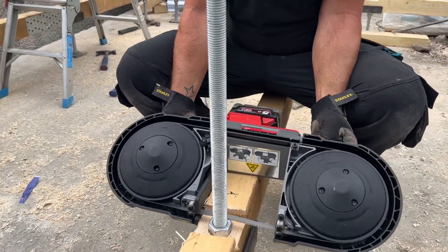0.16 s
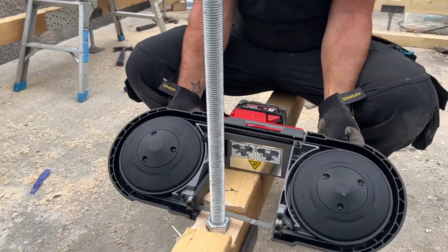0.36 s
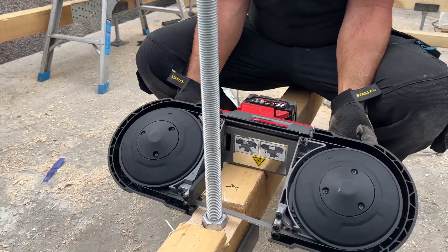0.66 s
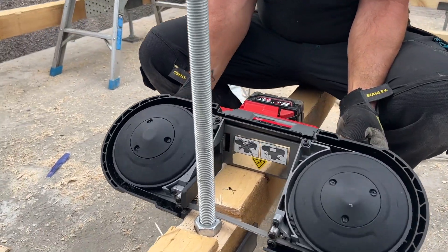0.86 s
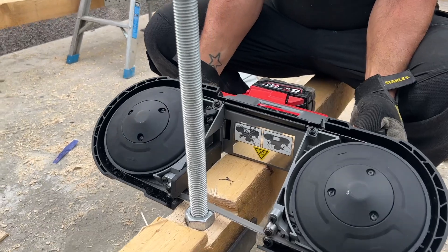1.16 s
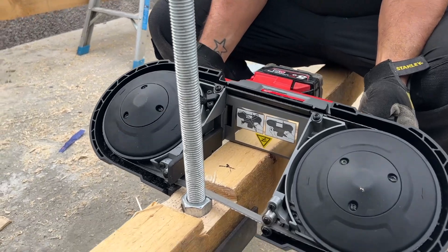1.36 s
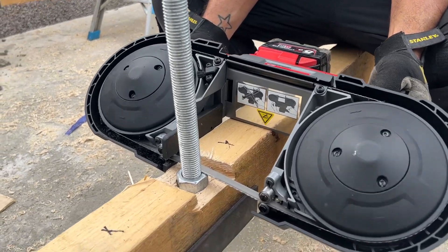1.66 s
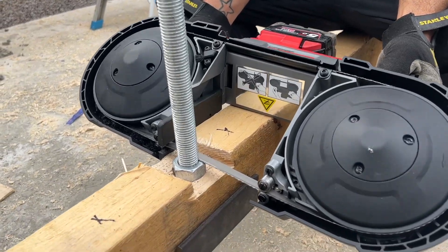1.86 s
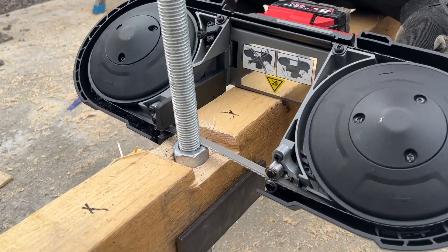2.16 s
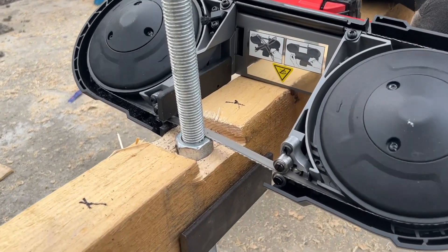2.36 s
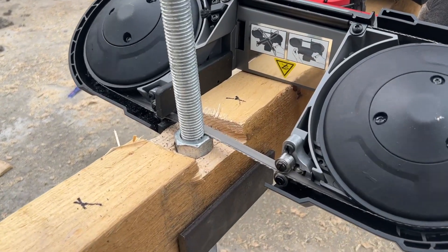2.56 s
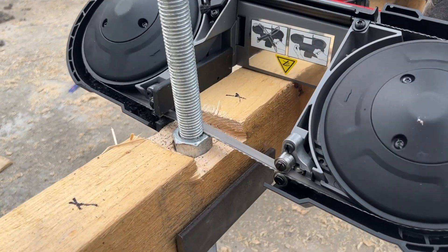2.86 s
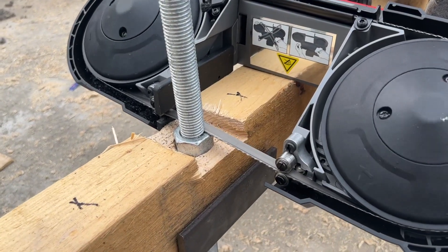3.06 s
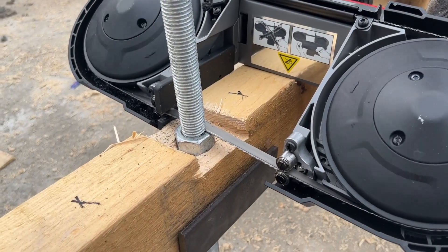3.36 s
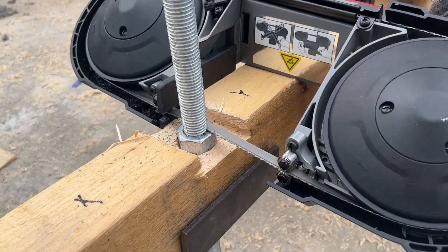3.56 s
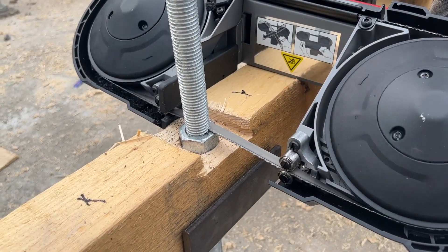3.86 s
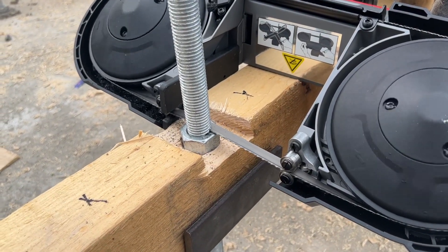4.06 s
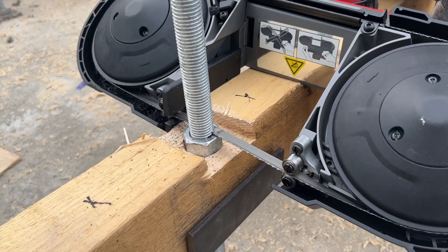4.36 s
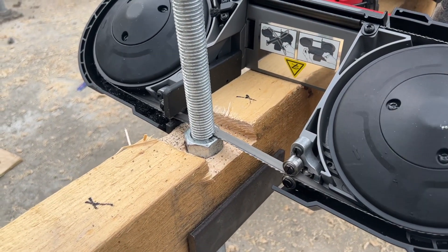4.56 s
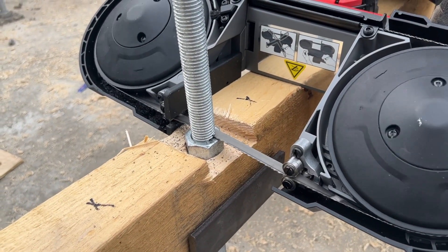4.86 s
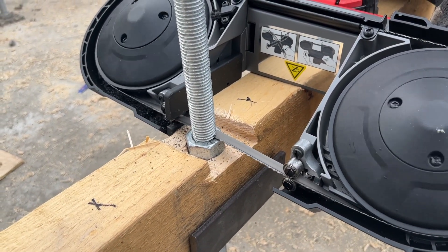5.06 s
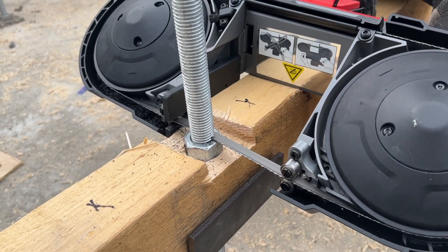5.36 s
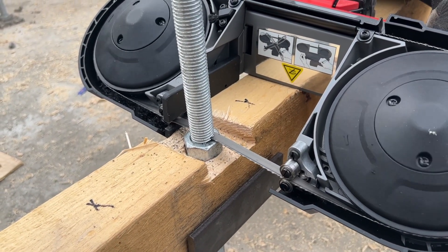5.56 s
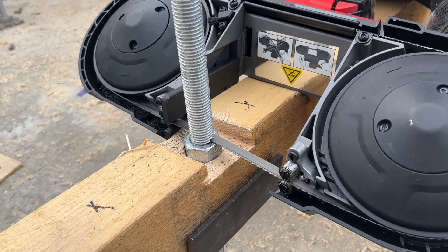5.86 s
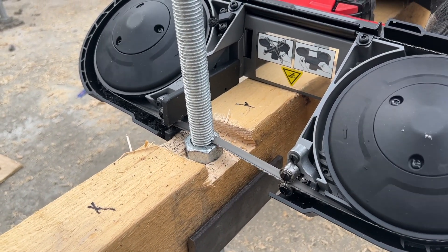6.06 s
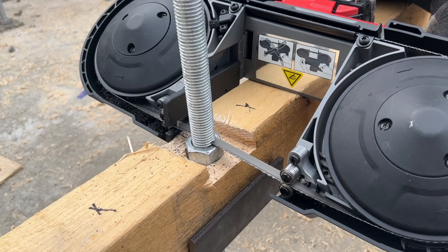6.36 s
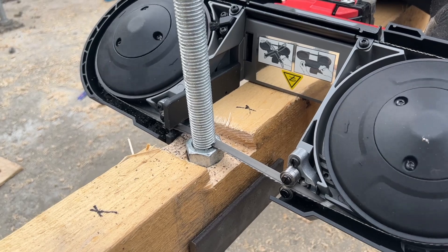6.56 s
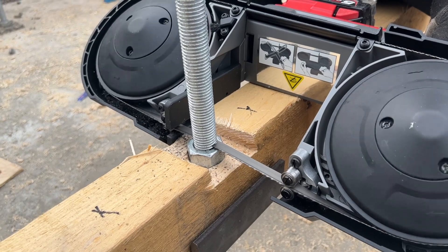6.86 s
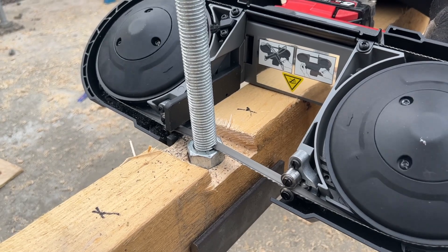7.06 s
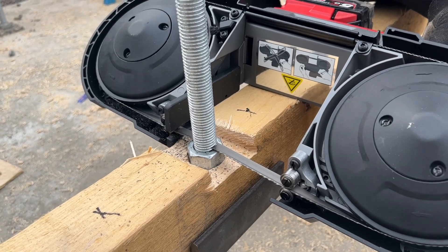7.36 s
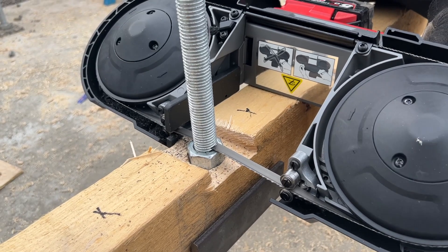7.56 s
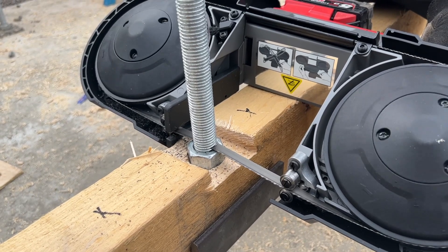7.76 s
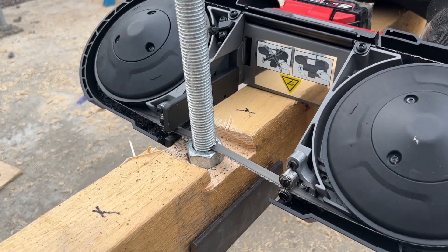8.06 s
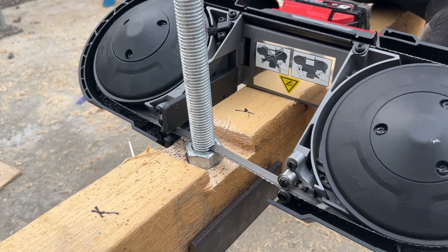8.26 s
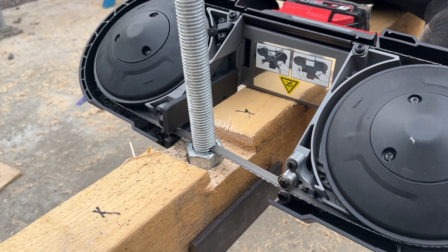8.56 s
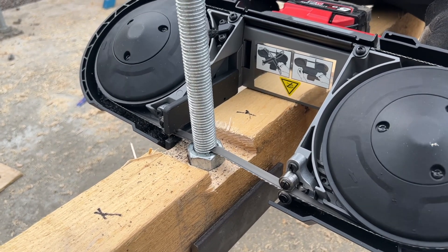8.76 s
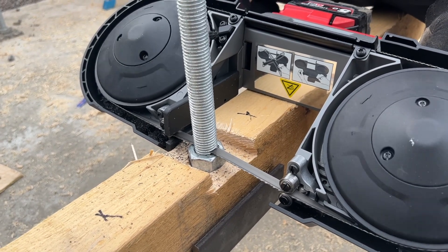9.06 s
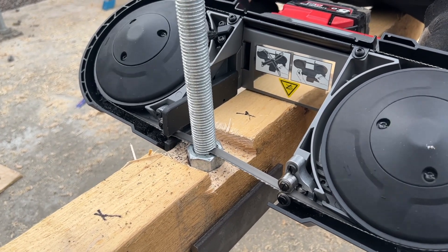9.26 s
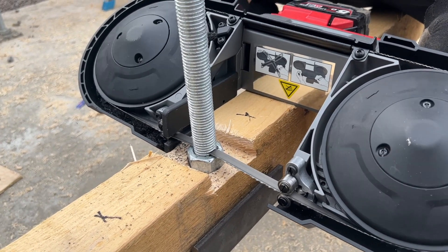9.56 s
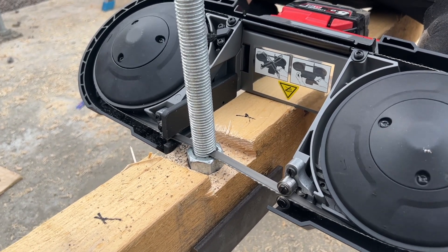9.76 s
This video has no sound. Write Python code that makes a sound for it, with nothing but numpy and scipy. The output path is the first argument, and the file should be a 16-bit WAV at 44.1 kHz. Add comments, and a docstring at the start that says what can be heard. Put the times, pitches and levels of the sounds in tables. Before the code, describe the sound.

A cordless band saw whines and squeals steadily while its teeth rasp and sizzle through a threaded steel rod, with occasional clacks and dull bumps outdoors.

```python
"""A band saw whines and squeals from the start as it cuts a threaded steel rod outdoors, close to a microphone.
Steady whines sound on multiples of the shaft speed over noise of air and rattle shaped by the housing. The
looping blade drags unevenly and makes the speed flutter; its rubbing squeals on two wavering modes. The teeth
rasp and sizzle: noise and tiny impacts through resonances that shift as the slot deepens. Clacks, dull damped
bumps, low rumble and wind join in; loud peaks duck the gain."""
import sys
import numpy as np
from scipy import signal
from scipy.fft import rfft, irfft, next_fast_len
from scipy.io import wavfile
from scipy.ndimage import uniform_filter1d

SR = 44100
rng = np.random.default_rng(int(sys.argv[2]) if len(sys.argv) > 2 else 0)


def wav_out(sig):
    """Save sig, one row per channel (or a flat mono array), as 16-bit PCM at SR to the path in sys.argv[1]."""
    wavfile.write(sys.argv[1], SR, np.round(np.clip(np.atleast_2d(sig).T, -1, 1) * 32767).astype(np.int16))


N = 437031
T = np.arange(N) / SR
DEPTH = T / T[-1]  # how far the cut has gone, 0-1

# shaft turns per loop of the blade, turn of its drive wheel, turn of the reduction gear
TURNS_PER_LOOP, TURNS_PER_WHEEL, TURNS_PER_GEAR = 153.58, 67.35, 6.68

# resonances of the wheel covers: centre_hz, width_hz, lift_db
COVER_MODES = [(616, 24, -9), (650, 79, 5.5), (1018, 50, 4)]


def amp(db):
    """Decibels to gain."""
    return np.exp(np.asarray(db) * np.log(10) / 20)


def unit(x):
    """Scales to rms 1."""
    return x / np.sqrt(np.mean(x ** 2) + 1e-20)


def noise():
    """White noise over the whole scene."""
    return rng.standard_normal(N)


def curves(table):
    """Every column of a timed table, interpolated sample by sample."""
    s, *columns = np.transpose(table)
    return [np.interp(T, s, column) for column in columns]


def colour(x, spectrum, resonances=()):
    """Filters x by a broad spectrum with narrow resonances on top; rms 1."""
    size = next_fast_len(N)
    hz = np.fft.rfftfreq(size, 1 / SR)
    spectrum_hz, spectrum_db = np.transpose(spectrum)
    shape_db = np.interp(np.log(hz + 1), np.log(spectrum_hz), spectrum_db)
    for centre_hz, width_hz, lift_db in resonances:
        shape_db = shape_db + lift_db / (1 + (2 * (hz - centre_hz) / width_hz) ** 2)
    return unit(irfft(rfft(x, size) * amp(shape_db), size)[:N])


def high_pass(x, hz):
    """Takes the bass away below hz."""
    return signal.sosfilt(signal.butter(2, hz, "high", fs=SR, output="sos"), x)


def wander(hz):
    """Random motion of rms 1, mostly slower than hz."""
    step = 20  # samples
    coarse_t = T[::step]
    pole = np.exp(-2 * np.pi * hz * step / SR)
    steps = signal.lfilter([1], [1, -pole], rng.standard_normal(len(coarse_t)))
    return unit(np.interp(T, coarse_t, uniform_filter1d(steps, size=5)))


def lifts(events, step=50):
    """Brief swells of level in dB, from rows of time, half length and height."""
    t = T[::step]
    lift_db = sum(db * np.exp(-((t - s) / half_s) ** 2) for s, half_s, db in events)
    return np.interp(T, t, lift_db)


def add(mix, s, sound):
    """Mixes a sound in at time s."""
    part = mix[max(round(s * SR), 0):][:len(sound)]
    part += sound[:len(part)]


def passing(loops, place, width):
    """Swells to 1 each time a place on the blade comes round."""
    offset = (loops - place + .5) % 1 - .5
    return np.exp(-(offset / width) ** 2)


def chatter(per_s, spread_db):
    """A dense train of tiny impacts of random size; rms 1."""
    hits = rng.random(N) < per_s / SR
    size_db = spread_db * np.minimum(rng.exponential(1, N), 4)
    return unit(hits * noise() * amp(size_db))


def whine(turns, order, shimmer_db, slop_rad):
    """One multiple of a rotation or vibration, shaken in level and in phase; rms 1."""
    phase = 2 * np.pi * order * turns + slop_rad * wander(24)
    return unit(amp(shimmer_db * wander(72)) * np.sin(phase))


def blade_drag(loops, chance=0.304, step=50):
    """Tight stretches bind in the slot once a loop: drag that repeats, never quite alike; rms 1."""
    # place (share of the loop), relative drag
    tight_spots = [(0.013, 0.45), (0.135, 0.4), (0.272, 0.44), (0.382, .6), (0.503, 0.64), (0.605, 0.94),
                   (0.726, 0.93), (0.782, 0.6), (0.904, 0.72)]
    tight_width = 0.035  # share of the loop
    pattern = sum(drag * passing(loops[::step], place, tight_width) for place, drag in tight_spots)
    repeating = unit(np.interp(T, T[::step], pattern - pattern.mean()))
    return unit(repeating + chance * wander(12.1))


def drive(flutter=0.00304, gear_flutter=0.0038):
    """Shaft turns, slowed by the blade's drag and rocked by the reduction gear; also drag and gear swing."""
    # trend of the shaft speed under the feed: start_s, shaft_hz
    speed_trend = [(0.0, 268.0), (0.35, 268.1), (0.7, 269.0), (1.0, 269.1), (1.3, 270.3), (2.1, 270.6),
                   (3.0, 271.3), (5.0, 271.5), (6.9, 271.7), (7.3, 270.8), (7.75, 270.4), (8.1, 271.3),
                   (9.91, 271.5)]
    trend_hz, = curves(speed_trend)
    steady_turns = np.cumsum(trend_hz) / SR
    drag = blade_drag(steady_turns / TURNS_PER_LOOP)
    gear = np.sin(2 * np.pi * steady_turns / TURNS_PER_GEAR)
    shaft_hz = trend_hz * (1 - flutter * drag + gear_flutter * gear)
    return np.cumsum(shaft_hz) / SR, drag, gear


def rumble():
    """Brief, faint swells of low noise over a light wind on the microphone."""
    # low swells: centre_s, level_db, half_length_s
    swell_rows = [(0.1, -67, .1), (0.973, -59, .05), (1.381, -75, .06), (2.147, -64, .08),
                  (3.87, -60, 0.066), (4.63, -60, 0.037), (5.785, -56, .05), (6.817, -53, 0.065),
                  (6.998, -59, .04), (7.22, -63, 0.062), (7.77, -59, .06)]
    # wind: start_s, level_db
    wind_curve = [(0, -66), (0.85, -63), (1.0, -55), (1.35, -47), (1.8, -68), (2.6, -58), (3, -78),
                  (6, -68), (9.2, -78), (9.6, -55), (9.91, -58)]
    swell = sum(amp(db) * np.exp(-((T - s) / half_s) ** 2) for s, db, half_s in swell_rows)
    wind_db, = curves(wind_curve)
    wind = amp(wind_db) * colour(noise(), [(10, 0), (25, -16), (50, -35), (200, -57)])
    return wind + swell * colour(noise(), [(35, -14), (90, 2), (140, 0), (280, -10), (700, -50)])


def outdoors(x, echo_db=-13, t60_s=0.49):
    """Faint scattered reflections from the ground and nearby things."""
    t = np.arange(SR // 4) / SR
    taps = rng.standard_normal(len(t)) * (t > .008) * amp(-60 * t / t60_s)
    return x + amp(echo_db) * signal.oaconvolve(x, taps / np.linalg.norm(taps))[:N]


def bumps(knock_hz=900, knock_s=0.00074, knock_db=4, rise_s=0.0033, low_cut_hz=170):
    """Each bump rings a few low, damped modes; a hard one starts with a short woody knock."""
    # start_s, level_db, hardness (0-1)
    bump_rows = [(0.556, -40, .1), (0.924, -39, .1), (0.965, -43, 0), (4.571, -25.5, .8), (4.581, -34, 1),
                 (4.589, -25, .3), (4.603, -21.5, 0.4), (5.279, -25.5, 0.17), (5.289, -28, 0.3),
                 (5.299, -29, 0.2), (5.304, -26, 0), (5.349, -33, .1), (5.7248, -15, 1), (8.765, -41, 0.09)]
    # damped modes: pitch_hz, relative level_db, t60_s
    bump_modes = [(171, -14, 0.081), (265, -11, 0.11), (314, 1, 0.049), (396, -5.5, 0.047),
                  (472, -8, 0.039)]
    t, out = np.arange(SR // 5) / SR, np.zeros(N)
    body = sum(amp(db - 60 * t / t60_s) * np.sin(2 * np.pi * hz * t) for hz, db, t60_s in bump_modes)
    body = high_pass(body * (1 - np.exp(-t / rise_s)), low_cut_hz)
    body = body / abs(body).max()
    knock_shape = t / knock_s * np.exp(1 - t / knock_s)
    knock = amp(knock_db) * knock_shape * np.sin(2 * np.pi * knock_hz * t)
    for s, db, hardness in bump_rows:
        add(out, s, amp(db) * (body + hardness * knock))
    return out


def clacks(ring_s=0.012, rise_s=0.0009, low_cut_hz=400, trim_db=-5.0):
    """Short, sharp clacks from the housing: bursts of noise with little bass."""
    # start_s, level_db before the trim
    clack_rows = [(0.356, -17.5), (1.633, -34), (2.109, -26), (2.892, -22), (4.578, -17), (6.03, -20),
                  (6.413, -19), (7.727, -17), (9.253, -25)]
    # clack of the housing: frequency_hz, relative density_db_per_hz
    clack_spectrum = [(250, -27), (480, -7), (680, 3.5), (950, -16), (1500, -11), (3000, -21), (8000, -50)]
    t, envelope = np.arange(SR // 10) / SR, np.zeros(N)
    for s, db in clack_rows:
        add(envelope, s, amp(db + trim_db) * (np.exp(-t / ring_s) - np.exp(-t / rise_s)))
    return high_pass(envelope * colour(noise(), clack_spectrum, COVER_MODES), low_cut_hz)


def housing(turns, level_db=-33.0, rattle=0.55, uneven_db=0.83):
    """Fan air and the rattle of wheels and rollers sound through the covers, louder as the weld passes."""
    # fan air and wheel noise: frequency_hz, relative density_db_per_hz
    housing_spectrum = [(45, -49), (90, -36.5), (145, -27.5), (200, -27.5), (320, -20.5), (390, -19),
                        (500, -3), (570, 2), (745, -6), (850, -2), (1080, -6), (1270, -11.5), (1600, -14),
                        (2200, -30.5), (8000, -50)]
    push = noise() + rattle * chatter(per_s=900, spread_db=1.5)
    # the weld jolts the guides once a loop; place and width are shares of the loop
    weld_db = 4.5 * passing(turns / TURNS_PER_LOOP, place=0.654, width=0.0093)
    gain = amp(level_db + weld_db + uneven_db * wander(12))
    return gain * colour(push, housing_spectrum, COVER_MODES)


def shaft_lines(turns):
    """Fairly clean lines on multiples of the shaft speed."""
    # steady whines: multiple of the shaft speed, rms level_db
    steady_orders = [(1, -62.5), (5, -65), (7, -55), (8, -55.5), (10, -52), (16, -51), (18, -43),
                     (36, -67.5), (39, -61.5)]
    # strong whines: start_s, then rms levels order_4_db, order_6_db, order_12_db
    strong_whines = [(0.0, -35.5, -53, -39), (0.14, -37, -48, -36.5), (0.36, -35.5, -40, -46.5),
                     (0.66, -34.5, -40.5, -37), (0.85, -34, -39.5, -46.5), (1.3, -35, -38.5, -40),
                     (2.3, -35.5, -39, -39), (3.7, -36, -41.5, -37.8), (5.6, -36, -40, -36),
                     (6.4, -35.5, -40, -37.5), (6.9, -35.3, -40.5, -34.5), (7.6, -36.5, -39.3, -37),
                     (8.8, -36, -39.7, -36.5), (9.91, -36, -39, -33.5)]
    fourth_db, sixth_db, twelfth_db = curves(strong_whines)
    steady = sum(amp(db) * whine(turns, order, shimmer_db=2.5, slop_rad=0.043 * order)
                 for order, db in steady_orders)
    fourth = amp(fourth_db) * whine(turns, order=4, shimmer_db=1.4, slop_rad=0.17)
    sixth = amp(sixth_db) * whine(turns, order=6, shimmer_db=1.6, slop_rad=0.12)
    twelfth = amp(twelfth_db) * whine(turns, order=12, shimmer_db=1.8, slop_rad=0.1)
    return steady + fourth + sixth + twelfth


def squeal(drag, gear, upper_ratio=2.165, jitter_hz=5, late_jitter_hz=24, sag_hz=9,
           drag_db=1.95, gear_db=3.0, low_trim_db=-1.5):
    """Two modes of the rubbing blade: drag makes them louder and flatter, depth blurs them, gear throbs the low."""
    # start_s, pitch_hz before sag and jitter, low_db before the trim, high_db
    squeal_curve = [(0.0, 4810, -37, -61), (1.0, 4823, -40.5, -57.5), (1.6, 4856, -38, -60),
                    (3.2, 4853, -39.5, -64), (5.2, 4870, -42.5, -60), (7.0, 4857, -50, -62),
                    (9.91, 4876, -52, -62)]
    # the blade binds and squeals out: centre_s, half_length_s, lift_db of the low mode
    bind_rows = [(0.03, .08, 4), (0.38, 0.27, 7.5), (0.98, 0.23, 7.5), (1.8, 0.16, 2), (1.53, 0.1, 2.5),
                 (2.11, .05, 6), (2.627, 0.16, 4), (3.31, 0.083, 6), (3.83, .05, 4), (5.05, 0.099, 4),
                 (7.81, 0.046, 11), (8.92, .03, 0)]
    trend_hz, low_db, high_db = curves(squeal_curve)
    bind_db = drag_db * drag + lifts(bind_rows)
    jitter = (jitter_hz + late_jitter_hz * DEPTH) * wander(67)
    cycles = np.cumsum(trend_hz - sag_hz * drag + jitter) / SR
    low_gain = amp(low_db + low_trim_db + bind_db + gear_db * gear)
    low = low_gain * whine(cycles, order=1, shimmer_db=1.4, slop_rad=0.56)
    high_gain = amp(high_db + 0.77 * bind_db)
    high = high_gain * whine(upper_ratio * cycles, order=1, shimmer_db=3.0, slop_rad=0.7)
    return low + high


def teeth(pressure):
    """Countless tooth strikes, too dense to tell apart."""
    return pressure * (chatter(per_s=7000, spread_db=1.0) + 1.19 * noise())


def deepening(pressure, spectrum, early, late):
    """Tooth strikes through resonances that shift as the cut deepens, fastest at first."""
    late_share = np.sqrt(DEPTH)
    shallow = np.sqrt(1 - late_share) * colour(teeth(pressure), spectrum, early)
    deep = np.sqrt(late_share) * colour(teeth(pressure), spectrum, late)
    return shallow + deep


def cutting(turns, drag, ring_drag_db=-0.5, ring_skip=1.685, tooth_db=1.0, ring_trim_db=1.5, sizzle_trim_db=2.5):
    """Teeth, two to a shaft turn, tear chips from the rod, ring rod and blade, and scrape along the slot."""
    # levels before the trims: start_s, blade_ring_db, fine_chip_sizzle_db
    ring_sizzle_curve = [(0.0, -48, -62), (1.0, -47, -61.5), (2.5, -48, -62), (3.3, -42.5, -58),
                         (4.2, -44, -56), (5.65, -41, -56.5), (5.95, -41.5, -59.5), (6.45, -40.5, -53.5),
                         (7.0, -37, -50), (7.55, -41, -53.5), (8.4, -40, -53.5), (9.0, -41, -57.5),
                         (9.6, -40.5, -57), (9.7, -38.5, -45.5), (9.91, -45, -47)]
    # levels as the slot deepens: start_s, bite_db, scrape_db, rod_chatter_db
    depth_curve = [(0.0, -36, -40.5, -54), (0.6, -37.5, -43, -51), (1.2, -37.5, -43.3, -51),
                   (2.4, -37, -42, -49), (3.3, -37, -40, -47), (4.3, -37, -41.5, -46.5),
                   (5.9, -36, -40, -42.5), (6.8, -36.3, -42, -46), (7.6, -36, -43, -44),
                   (9.91, -35.5, -43.5, -46)]
    # the rod rings out briefly: centre_s, half_length_s, lift_db
    ring_rows = [(2.81, .03, 7), (4.17, .03, 5), (5.9, .04, 7), (7.58, 0.037, 5)]
    # spectra of teeth biting, chattering rod, free blade span, scraping flanks and fine chips:
    # frequency_hz, relative density_db_per_hz
    bite_spectrum = [(500, -27.5), (1300, -9.5), (1800, -2.5), (2060, -2.5), (2600, -2), (3200, 0.5),
                     (3420, -5.5), (3900, -3.5), (4170, -8), (4500, -7), (5100, -5), (6000, -36),
                     (16000, -54)]
    rod_spectrum = [(1900, -46), (2110, -27), (2180, 6.5), (2260, -2), (2340, 0), (2420, -13), (2700, -31)]
    blade_spectrum = [(3800, -54), (4350, 1.5), (4520, 0), (4640, 6.5), (4770, 4.5), (4950, -2),
                      (5150, -35), (6000, -60)]
    scrape_spectrum = [(3500, -17), (5000, 2), (5420, 5), (5700, 1.5), (6350, 5), (6750, 0), (7050, 0),
                       (7350, -1.5), (7800, 0), (8500, -7), (10000, -12.5), (11000, -10.5), (13000, -19),
                       (16000, -35)]
    sizzle_spectrum = [(7000, -17), (10500, -2), (12000, -5.5), (14000, -2.5), (16000, -4)]
    # resonances of rod and guides, then of the slot, early and deep: centre_hz, width_hz, lift_db
    rod_early = [(2200, 210, -4), (3300, 270, 7.5), (3515, 73, 7.5), (3660, 110, 7.5), (3944, 250, 10)]
    rod_late = [(2590, 170, 4.5), (2880, 80, 2), (3305, 75, 8), (3460, 100, 1.5), (3720, 80, 5.5),
                (3884, 120, -12), (3965, 60, 9)]
    slot_early = [(8800, 900, 4.5), (9700, 300, 8.5), (11800, 1500, 2), (14200, 1800, -5)]
    slot_late = [(6480, 150, 1), (7130, 150, 2.5), (8710, 900, -1.5), (12500, 900, 2.5), (14000, 600, 1)]

    ring_db, sizzle_db = curves(ring_sizzle_curve)
    bite_db, scrape_db, chatter_db = curves(depth_curve)
    # a run of teeth hardly cuts once the slot is deep; place and width are shares of the loop
    skip_db = -2.5 * DEPTH * passing(turns / TURNS_PER_LOOP, place=0.51, width=0.051)
    # the thinning rod throbs once per wheel turn, peaking half way round
    throb_db = 2.5 * DEPTH * np.cos(2 * np.pi * (turns / TURNS_PER_WHEEL - 0.5))
    tooth_swing_db = tooth_db * np.sin(2 * np.pi * 2 * turns)
    pressure = amp(0.17 * drag + 0.53 * wander(7.8) + skip_db + tooth_swing_db)

    bite = amp(bite_db + 0.076 * throb_db) * deepening(pressure, bite_spectrum, rod_early, rod_late)
    rod_gain = amp(chatter_db + lifts(ring_rows) + throb_db + skip_db + 1.0 * wander(12))
    rod = rod_gain * colour(teeth(pressure), rod_spectrum)
    ring_motion_db = ring_drag_db * drag + ring_skip * skip_db + 1.7 * wander(9.4)
    ring_gain = amp(ring_db + ring_trim_db + ring_motion_db)
    blade = ring_gain * colour(noise(), blade_spectrum, [(4590, 44, 4.3), (4580, 70, 1.5)])
    scrape_gain = amp(scrape_db + 0.84 * wander(25))
    scrape = scrape_gain * deepening(pressure, scrape_spectrum, slot_early, slot_late)
    sizzle_gain = amp(sizzle_db + sizzle_trim_db + 0.8 * wander(25))
    sizzle = sizzle_gain * deepening(pressure, sizzle_spectrum, slot_early, slot_late)
    return bite + rod + blade + scrape + sizzle


def scene():
    """Saw and bumps in open air, the same in both channels."""
    turns, drag, gear = drive()
    background = rumble() + outdoors(bumps())
    saw = clacks() + housing(turns) + shaft_lines(turns) + squeal(drag, gear) + cutting(turns, drag)
    mix = background + saw
    return np.array([mix, mix])


def record(dry, threshold_db=-22, most_db=3.0, recover_db_per_s=5, attack_s=0.005, edge_hz=15700):
    """Gain control ducks after a peak and recovers slowly; then the band limit."""
    power = uniform_filter1d(dry[0] ** 2, size=300)
    power_db = 10 * np.log10(abs(power) + 1e-12)
    over_db = np.clip(power_db - threshold_db, 0, most_db)
    # running maximum against a falling line: peak hold with linear recovery
    fall_db = T * recover_db_per_s
    held_db = np.maximum.accumulate(over_db + fall_db) - fall_db
    pole = np.exp(-1 / (attack_s * SR))
    ducked = dry / amp(signal.lfilter([1 - pole], [1, -pole], held_db))
    band_limit = signal.firwin(511, edge_hz, window=("kaiser", 9), fs=SR)
    return signal.oaconvolve(ducked, band_limit[None], "same")


dry = scene()
out = record(dry)
wav_out(out)
```